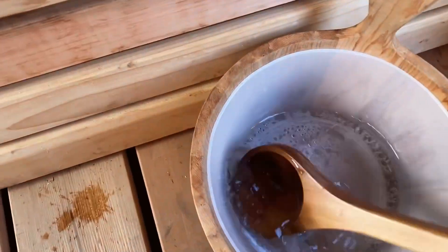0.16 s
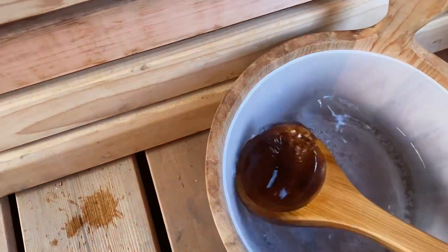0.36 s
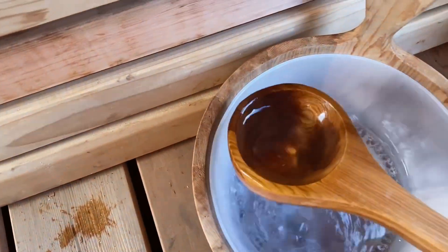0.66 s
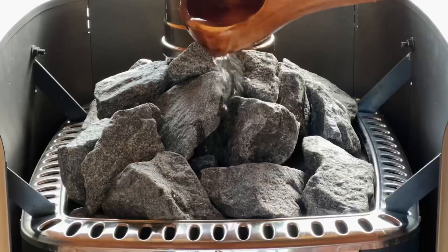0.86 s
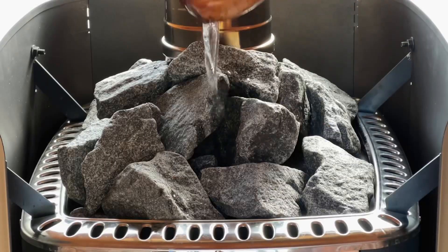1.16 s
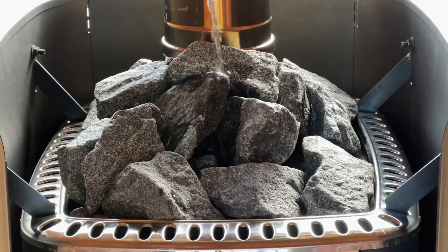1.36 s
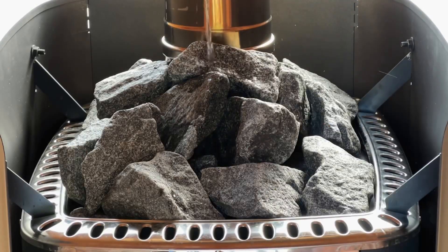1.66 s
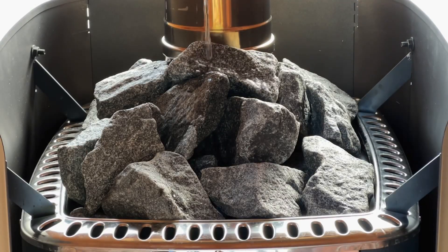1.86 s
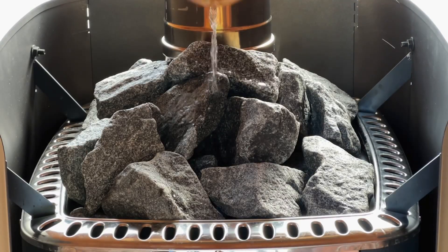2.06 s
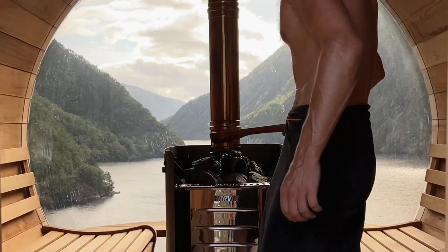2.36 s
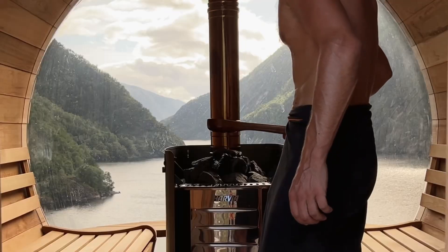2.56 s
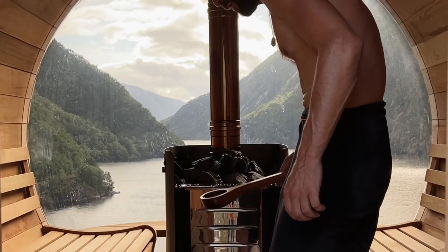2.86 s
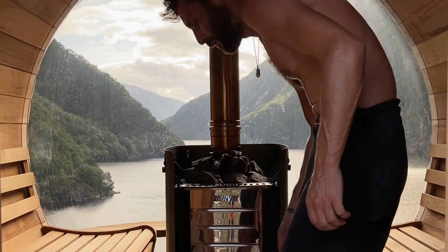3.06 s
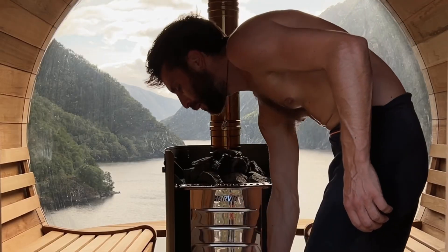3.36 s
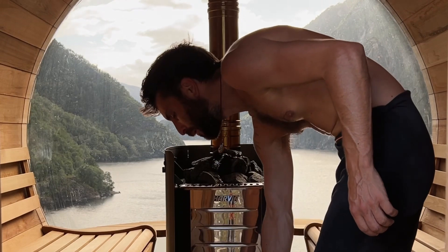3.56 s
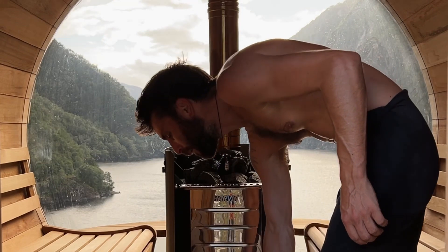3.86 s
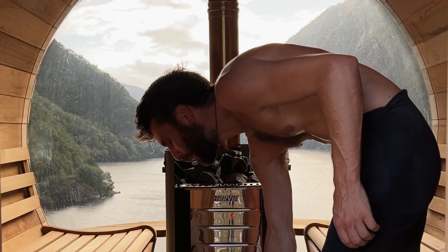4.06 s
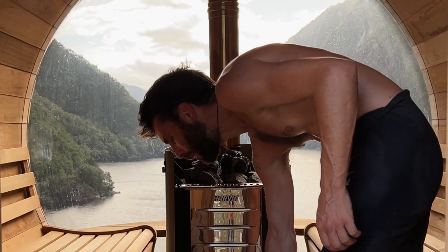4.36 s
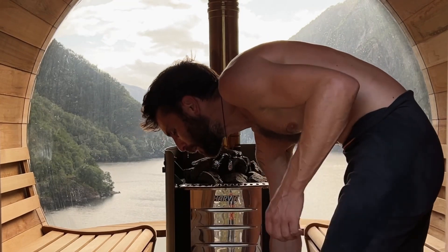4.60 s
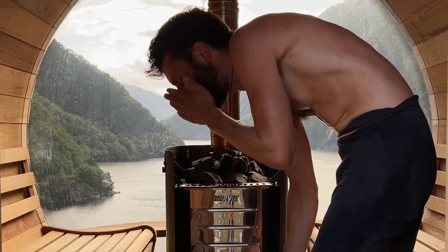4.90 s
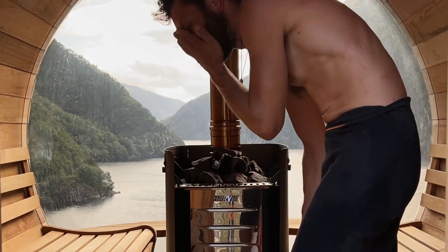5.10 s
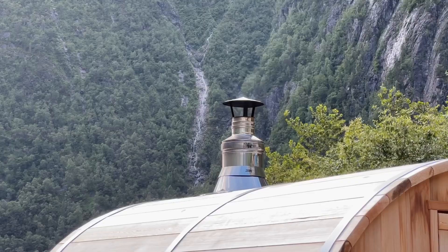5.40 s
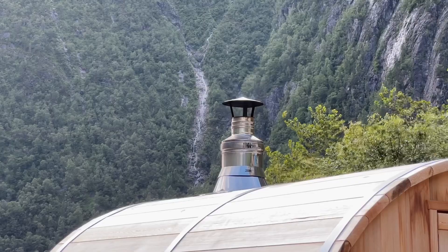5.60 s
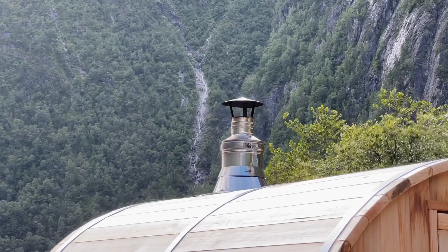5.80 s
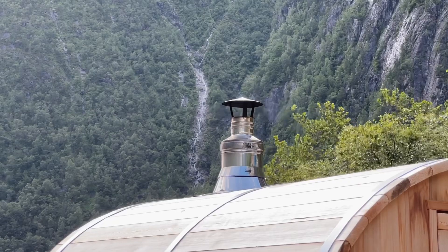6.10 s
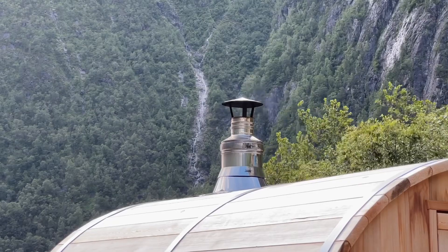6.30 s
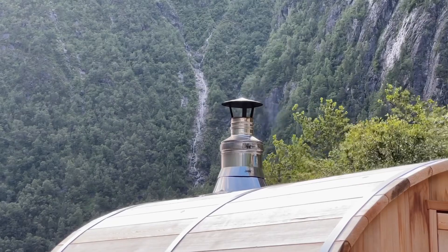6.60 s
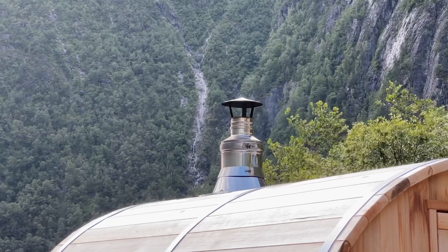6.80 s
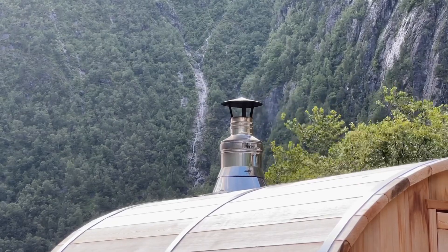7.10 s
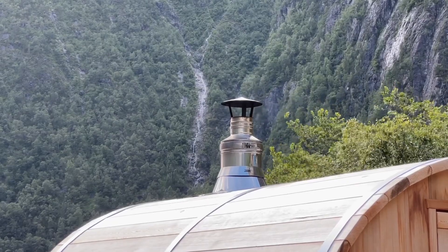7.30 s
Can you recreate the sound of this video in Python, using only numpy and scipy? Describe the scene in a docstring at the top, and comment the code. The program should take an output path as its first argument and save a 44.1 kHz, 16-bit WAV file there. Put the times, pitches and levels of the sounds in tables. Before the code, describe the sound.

A wooden ladle stirs and drips in a hollow bucket, water hisses on hot sauna stones, then the sizzle fades among floor thumps and a slap.

```python
"""Over a faint, deep draught, a wooden ladle stirs and fills in a bucket: the wall booms, air bubbles ring.
Then, right over hot sauna stones, poured water flashes to steam: random pops hiss, burst and simmer.
Then, from across the small wooden cabin, the sizzle dies down as the stones dry. Feet thump, knock and
scuff on the floorboards with sagging tones and shaped noise, and a wet hand slaps on skin."""
import sys
import numpy as np
from scipy import signal
from scipy.fft import rfft, irfft, next_fast_len
from scipy.io import wavfile

SR = 44100
rng = np.random.default_rng(int(sys.argv[2]) if len(sys.argv) > 2 else 0)


def int16_out(signal):
    """Quantize to a 16-bit WAV file."""
    q = np.round(np.clip(np.atleast_2d(signal).T, -1, 1) * 32767)
    wavfile.write(sys.argv[1], SR, q.astype(np.int16))


N = 328545
T = np.arange(N) / SR  # time in s
SIZE = next_fast_len(N + SR // 2, real=True)
HZ = np.arange(SIZE // 2 + 1) * SR / SIZE + 1e-3  # frequencies of the filters, just above 0 so logs work

AT_STONES_S, ACROSS_ROOM_S = 0.832, 2.233  # the listening place changes at once
BUBBLE_CYCLES = 36  # a small bubble takes this many cycles to fade by 60 dB

# deep and middle parts of a blow on wood: pitch_hz, level_db
WOOD_BOOM = [(25, -46), (50, -3.5), (75, -3.5), (120, -9.5), (170, -19), (400, -73)]
WOOD_BODY = [(90, -24), (190, 2.5), (290, -3), (420, -8), (650, -30), (1500, -69)]
# resonances of the floorboards: pitch_hz, width_hz, level_db
BOARD_RING = [(138, 13, 8.6), (160, 16, 0.76), (318, 80, 1.5), (490, 16, 5), (720, 28, 5), (844, 260, 4.9),
              (1274, 190, 7.1)]
# boards knock under shifting weight: start_s, boom_db, body_db, clack_db, ring_db, board_pitch_hz
KNOCKS = [(3.786, -65, -55, -51, -41, 275), (4.426, -38, -38, -36, -35, 258),
          (4.44, -35, -35, -39.5, -22.5, 264.7), (4.506, -44, -43, -51, -27.5, 262),
          (4.915, -68, -40.5, -52, -37, 308), (5.626, -48, -39, -37.5, -24, 270.4),
          (5.65, -54, -40.5, -50, -31, 285.3), (6.333, -47.5, -43, -51, -38, 293.4),
          (6.622, -61, -42, -48, -33.5, 334.5), (7.385, -72, -44, -70, -38.5, 263)]


def undb(db):
    """Decibels to gain."""
    return 10 ** (np.asarray(db) / 20)


def together(gains):
    """Level in dB of unrelated sounds that overlap: their powers add."""
    return 10 * np.log10(sum(g ** 2 for g in gains) + 1e-18)


def filtered(x, gain):
    """Apply a gain per frequency."""
    return irfft(rfft(x, SIZE) * gain, SIZE)[..., :N]


def colour(points):
    """Gain per frequency from (Hz, dB) points."""
    hz, db = np.transpose(points)
    return undb(np.interp(np.log(HZ), np.log(hz), db))


def resonances(table):
    """Gain per frequency of a few (Hz, width Hz, dB) peaks."""
    return undb(sum(db / (1 + (2 * (HZ - hz) / width) ** 2) for hz, width, db in table))


def below(hz, order=8):
    """Gain that keeps what lies below a frequency and fades what lies above."""
    return 1 / np.sqrt(1 + (HZ / hz) ** order)


def unit(x, band):
    """Scale a stereo sound so that its middle has rms 1 inside a band."""
    power = np.abs(rfft(x.mean(0), SIZE)[(HZ > band[0]) & (HZ < band[1])]) ** 2
    return x / np.sqrt(2 * power.sum() / SIZE / N)


def walk(rate):
    """Slow random wandering around 0 with a spread near 1."""
    knots = rng.standard_normal(2048)
    return 1.15 * np.interp(T * rate, np.arange(len(knots)), knots)


def between(start, end):
    """1 between two times, with very short fades."""
    fade_s = 0.004
    return np.clip((T - start) / fade_s, 0, 1) * np.clip((end - T) / fade_s, 0, 1)


def swell(s, rise, t60, hold=0):
    """Envelope that rises from time s, holds, then fades by 60 dB in t60 seconds."""
    fading = np.maximum(T - s - rise - hold, 0)
    return np.clip((T - s) / rise, 0, 1) * undb(-60 * fading / t60)


def add(out, s, x):
    """Mix a short sound in at time s."""
    i = max(int(s * SR), 0)
    out[..., i:i + x.shape[-1]] += x[..., :N - i]


def pops(rate, spread_db):
    """Single-sample clicks at random moments, of random size and sign."""
    out = np.zeros(N)
    at = np.flatnonzero(rng.random(N) < rate / SR)
    size = np.clip(rng.standard_normal(N)[at], -3, 2.5)
    sign = 2 * rng.integers(0, 2, N)[at] - 1
    out[at] = sign * undb(spread_db * size)
    return out


def room(x, wet_db, t60, width):
    """Direct sound plus the short, dense echo of wooden walls, partly different at each ear."""
    t = T[:SR // 4]
    mid, side = rng.standard_normal((2, len(t))) * undb(-60 * t / t60) * (t > .002)
    echo = (mid + width * np.array([side, -side])) * undb(wet_db) / np.linalg.norm(mid)
    echo[:, 0] += 1  # the direct sound
    return signal.oaconvolve(x[None], echo, axes=1)[:, :N] / np.sqrt(1 + undb(2 * wet_db))


def blows(rows, tone, width):
    """Blows (s, dB over the first 45 ms, rise s, t60 s) that wake many close modes: fading, coloured noise."""
    out, t, first = np.zeros((2, N)), T[:SR // 2], slice(0, 2000)
    gain = np.interp(np.fft.rfftfreq(len(t), 1 / SR), HZ, tone)
    for s, db, rise, t60 in rows:
        shape = np.minimum(t / rise, 1) * undb(-60 * np.maximum(t - rise, 0) / t60)
        mid, side = irfft(rfft(rng.standard_normal((2, len(t)))) * gain) * shape
        mid, side = mid / mid[first].std(), side / side[first].std()
        add(out, s, undb(db) * (mid + width * np.array([side, -side])))
    return out


def wood(table, ring):
    """Each blow booms in the whole structure, rings the struck board and clacks at the contact."""
    # the contact itself: pitch_hz, level_db
    wood_clack = [(250, -3.5), (550, 8.5), (850, -1), (1300, -6), (2200, -6.5), (4000, -16.5),
                  (9000, -29.5), (15000, -47)]
    s, boom_db, body_db, clack_db, rise, t60 = np.transpose(table)
    boom_part = blows(zip(s, boom_db, rise, t60 * 2.0), colour(WOOD_BOOM) * ring, width=0.21)
    body = blows(zip(s, body_db, rise * 1.08, t60 * 1.43), colour(WOOD_BODY) * ring, width=0.15)
    clack = blows(zip(s, clack_db, rise * .5, t60 * 1.09), colour(wood_clack) * ring, width=0.54)
    return boom_part + body + clack


def draught():
    """The stove draws air with a faint, deep rumble of filtered noise."""
    # pitch_hz, level_db
    draught_colour = [(25, -13), (65, 4.5), (110, -2.5), (180, -16), (500, -45), (2000, -80)]
    level_db, width = -55, 0.18
    mid, side = filtered(rng.standard_normal((2, N)), colour(draught_colour))
    return undb(level_db) * (mid + width * np.array([side, -side])) / mid.std()


def boom():
    """Each push swells the bucket's low modes; the lowest rings on once the ladle no longer damps it."""
    # low modes: pitch_hz, t60_s with the ladle in the water, t60_s once it is lifted out
    boom_modes = [(69, 0.33, 2), (108.1, 1, 0.6), (136.6, 1, 0.34)]
    # the ladle pushes the wall: start_s, lowest_mode_db, second_mode_db, third_mode_db
    pushes = [(-.02, -21, -28.5, -29.5), (.145, -32, -29.5, -38), (.255, -40, -22, -26.5),
              (.335, -22, -47, -30), (.45, -23.5, -29.5, -55)]
    ladle_out_s, rise_s = 0.356, 0.02
    out, stirred = 0, T < ladle_out_s
    starts, *levels = np.transpose(pushes)
    for (hz, damped_t60, free_t60), push_db in zip(boom_modes, levels):
        lost_db = np.cumsum(60 / np.where(stirred, damped_t60, free_t60)) / SR
        swells = []
        for s, db in zip(starts, push_db):
            lost_since_push = np.maximum(lost_db - np.interp(s + rise_s, T, lost_db), 0)
            swells.append(np.clip((T - s) / rise_s, 0, 1) * undb(db - lost_since_push))
        detune = np.where(stirred, .03, .008) * walk(25.0)  # the moving water detunes the wall
        tone = np.sin(2 * np.pi * np.cumsum(hz * (1 + detune)) / SR)
        out = out + undb(together(swells)) * tone
    return np.sqrt(2) * out


def bubble(hz, t60, glide):
    """A ringing air bubble whose pitch climbs as it nears the surface, by its glide every half t60."""
    rise_cycles = 1.7
    t = T[:SR // 6]
    pitch = hz * (1 + glide * np.minimum(2 * t / t60, 2))
    envelope = (1 - np.exp(-t * hz / rise_cycles)) * undb(-60 * t / t60)
    return np.sin(2 * np.pi * np.cumsum(pitch) / SR) * envelope


def trickle(count=16):
    """Water runs off the lifted ladle: a quick, broken run of small bubbles, growing weaker."""
    start_s, length_s, level_db = 0.6, .14, -39.5
    out = np.zeros(N)
    for when, pitch, size in rng.random((count, 3)):
        hz = 1200 * 2.4 ** (pitch ** 2)
        gain = undb(level_db + 6.4 * size - 5.6 * when)
        add(out, start_s + length_s * when, gain * bubble(hz, BUBBLE_CYCLES / hz, 0.05))
    return out


def drips(count=60):
    """Plops, gulps, small bubbles and ticks of drops; the hollow of the bucket rings after them."""
    # air bubbles, large and small: start_s, level_db, pitch_hz, pitch rise per half t60 (share), t60_s
    bubbles = [(0.18, -20, 1237, 0.057, 0.064), (0.207, -25.5, 1634, .03, 0.035),
               (.208, -21, 820, .03, 0.039), (.209, -18, 1150, .03, 0.022),
               (0.3075, -16, 1335, 0.23, 0.022), (.341, -14.5, 824, 0.2, 0.02),
               (.349, -25, 990, .06, 0.034), (.374, -34.5, 1960, 0.13, 0.05), (.395, -37, 1340, .04, 0.065),
               (.424, -31, 4400, 0.09, 0.014), (.458, -34, 4700, .04, 0.024),
               (0.466, -25.5, 3900, 0.05, 0.015), (.471, -34, 3100, .05, .016),
               (.498, -34, 5240, .02, 0.012), (0.509, -40, 1270, .01, 0.05),
               (.53, -36, 1256, 0.0091, 0.063), (.551, -41, 1300, .02, 0.054), (.553, -37, 2000, .05, .02),
               (.577, -28, 2640, 0.036, 0.022), (.645, -29.5, 1640, 0.019, 0.04),
               (0.665, -26, 3100, .12, 0.016), (.666, -28.5, 1620, 0.093, 0.054),
               (0.708, -35, 1160, 0.042, 0.094), (.731, -38, 586, .03, 0.099), (.753, -38, 1240, .03, .05),
               (.765, -33, 3420, .08, 0.015), (.771, -35, 5100, .08, .014), (.777, -33, 2790, 0.06, 0.025),
               (.784, -34, 5400, .03, .014), (.789, -37, 654, .02, 0.082)]
    # low gulps of air around the moving ladle: same columns
    gulps = [(.107, -40, 612, .02, .15), (.207, -25, 485, .03, 0.065), (.211, -18, 180, 0.044, 0.14),
             (.217, -21.5, 370, .04, 0.13), (.236, -33, 790, .03, 0.046), (.256, -28, 490, .03, 0.05),
             (.274, -34, 580, .04, 0.067), (.356, -30, 367, .08, 0.098), (.41, -33, 426, 0.044, .08),
             (.432, -30, 345, .05, .07)]
    # drops off the ladle tick on the water: start_s, level_db before the filters
    drops = [(0.209, -46), (.308, -45), (.559, -33), (0.571, -26), (0.645, -30), (.665, -32), (0.696, -44)]
    # the hollow of the bucket: pitch_hz, level_db, t60_s
    bucket_echo = [(606, -1, .3), (1330, 4.5, 0.49), (1800, 0, .2), (2800, -7, .15)]
    splash_db, splash_s = -15, 0.0018  # a bubble pinches off with a tiny splash, relative to its ring
    plops, ticks, t = trickle(), np.zeros(N), T[:SR // 50]
    for s, db, hz, glide, t60 in bubbles:
        add(plops, s, undb(db) * bubble(hz, t60, glide))
        splash = rng.standard_normal(len(t)) * np.exp(-t / splash_s)
        add(ticks, s, undb(db + splash_db) * min(hz / 3500, 1) * splash)  # low bubbles splash less
    for s, db, hz, glide, t60 in gulps:
        add(plops, s, undb(db) * bubble(hz, t60, glide))
    for s, db in drops:
        add(ticks, s, undb(db) * rng.standard_normal(len(t)) * np.exp(-t / 0.0028))
    for when, pitch, size in rng.random((count, 3)):
        hz = 1800 * 3.7 ** pitch
        gain = undb(-53 + 11 * size ** 2)
        add(plops, when * AT_STONES_S, gain * bubble(hz, BUBBLE_CYCLES / hz, 0.055))
    hollow = 1
    for hz, db, t60 in bucket_echo:
        hollow = hollow + undb(db) / (1 + 2j * np.pi * (HZ - hz) * t60 / np.log(1000))
    wet = filtered(plops + filtered(ticks, below(7700, order=3)), hollow)
    return room(wet, wet_db=-7, t60=0.38, width=1.1)


def bucket():
    """The stirred bucket booms and is bumped while water swirls and drips off the ladle."""
    # colour of the sloshing: pitch_hz, level_db
    slosh_colour = [(200, 1), (350, 1.5), (700, -2.5), (1600, -5), (2500, -7), (4500, -8), (7000, -11),
                    (9000, -27.5), (12000, -22), (15000, -60)]
    # resonances of the bucket: pitch_hz, width_hz, level_db
    bucket_ring = [(205, 46, -1.5), (382, 17, 5), (621, 39, 10.5), (790, 49, 0), (1260, 64, 5),
                   (2040, 270, 4.5), (2640, 420, 4)]
    # the ladle bumps the bucket: start_s, boom_db, body_db, clack_db, then rise_s and t60_s, scaled per part
    bumps = [(0.0, -25, -29.5, -28.5, 0.00075, 0.33), (0.208, -37, -31.5, -46, 0.00045, 0.31),
             (0.265, -35, -34, -55, 0.017, 0.39), (0.342, -29.5, -38.5, -58, 0.0033, 0.48),
             (0.694, -63, -64, -44.5, 0.0011, 0.13)]
    # strokes of the ladle swirl the water: start_s, level_db, rise_s
    strokes = [(.16, -37, 0.069), (.645, -45.5, 0.035)]
    stroke_t60_s, steady_swirl_db, spray_db = 0.97, -50.5, -49  # a stroke dies away into the steady swirl
    ring = resonances(bucket_ring)
    stroke_gains = [undb(db) * swell(s, rise, stroke_t60_s) for s, db, rise in strokes]
    swirl_db = together([undb(steady_swirl_db)] + stroke_gains)
    splashing = room(pops(2500, spread_db=2.5), wet_db=-3.5, t60=0.35, width=1.6)
    water = filtered(splashing, colour(slosh_colour) * ring ** 0.24)
    low = below(1260)
    swirl = unit(filtered(water, low), (250, 2000)) * undb(swirl_db)
    spray = unit(filtered(water, 1 - low), (3000, 8000)) * undb(spray_db)
    return boom() + swirl + spray + drips() + wood(bumps, ring)


def thuds():
    """A soft heel bends the floor for a few deep cycles and stirs the boards around it."""
    # start_s, level_db, pitch_hz at the start, rise_s, t60_s
    heel_thuds = [(2.473, -24.5, 87, 0.025, 0.13), (2.526, -35, 204, .005, 0.13),
                  (2.54, -28, 119, .007, .06), (2.672, -35, 132, .012, 0.072), (2.699, -38, 62, .015, .15),
                  (3.902, -31.5, 73, 0.032, .14), (4.003, -27.5, 100, .022, .22),
                  (4.052, -21, 113, 0.007, 0.058), (4.098, -29.5, 64, .016, .15),
                  (4.262, -37.5, 86.6, 0.017, .2), (4.313, -38, 96, .02, .15),
                  (4.429, -35, 72, 0.0092, .15), (4.575, -33, 112, .01, 0.11),
                  (4.612, -32.5, 85.5, .012, .2), (6.641, -28, 144, 0.013, 0.16),
                  (6.648, -30, 89, 0.0059, .15), (6.765, -31, 86, 0.015, 0.11),
                  (6.795, -27, 83, 0.015, 0.19), (7.198, -32, 108, 0.0087, 0.086)]
    body_db = -30  # relative to the thud
    sag, sag_s = 0.14, 0.034  # the pitch sags by a share, with this time constant, as the weight settles
    out, t = np.zeros(N), T[:SR // 2]
    for s, db, hz, rise, t60 in heel_thuds:
        pitch = hz * (1 - sag * (1 - np.exp(-t / sag_s)))
        add(out, s, undb(db) * np.sin(2 * np.pi * np.cumsum(pitch) / SR) * swell(0, rise, t60)[:len(t)])
    body_rows = [(s, db + body_db, rise, t60) for s, db, _, rise, t60 in heel_thuds]
    body = blows(body_rows, colour(WOOD_BODY), width=0.43)
    return room(out, wet_db=-21, t60=0.54, width=1.0) + body


def boards():
    """A knocked board bends and rings on in its own modes; the high ones speak first."""
    # modes of a floorboard: multiple of its pitch, level_db relative to the ring, t60_s
    board_modes = [(1, 1.5, 0.23), (1.19, -6, 0.22), (1.85, -14.5, .25), (2.55, -18, .3), (3.2, -18, 0.2),
                   (4.5, -21, 0.44), (4.85, -9, .07)]
    delay_s, rise_cycles = 0.0035, 2.1  # each mode builds up over a few of its own cycles
    out, t = np.zeros(N), T[:SR // 2]
    for s, *_, db, hz in KNOCKS:
        detune = 1 + .01 * rng.standard_normal(len(board_modes))
        for (ratio, mode_db, t60), d in zip(board_modes, detune):
            cycles = hz * ratio * d * t
            envelope = undb(db + mode_db - 60 * t / t60) * np.minimum(cycles / rise_cycles, 1)
            add(out, s + delay_s, envelope * np.sin(2 * np.pi * cycles))
    return room(out, wet_db=-11, t60=0.37, width=0.52)


def scuffs():
    """A sliding sole scrapes the board, shakes the floor and hisses over grit."""
    # start_s, scrape_db, body_db, grit_db, rise_s
    sole_scuffs = [(4.69, -50, -43.5, -62, 0.011), (5.43, -44, -50.5, -60, 0.011),
                   (6.62, -49, -42, -47.5, 0.0068), (6.735, -46, -46, -51.5, .018),
                   (6.82, -37.5, -40.5, -50, 0.013), (6.85, -40, -43.5, -57, 0.01),
                   (7.112, -41.5, -39.5, -48, 0.014), (7.145, -50, -48, -62, 0.012)]
    # colours of the scrape and of the grit: pitch_hz, level_db
    scrape_colour = [(250, 0.5), (550, 7), (850, -2), (1300, -7), (2200, -7.5), (4000, -30), (9000, -38)]
    grit_colour = [(600, -18), (1500, 5), (2600, 0), (4500, -7), (7000, -9), (14000, -26)]
    boom_over_body_db = -4.5
    s, scrape_db, body_db, grit_db, rise = np.transpose(sole_scuffs)
    ring = resonances(BOARD_RING)
    t60, grit_t60 = np.full(len(s), 0.38), np.full(len(s), 0.23)
    boom_rows = zip(s, body_db + boom_over_body_db, rise, t60 * 2.7)
    boom_part = blows(boom_rows, colour(WOOD_BOOM) * ring, width=0.13)
    body = blows(zip(s, body_db, rise, t60 * 0.94), colour(WOOD_BODY) * ring, width=0.11)
    scrape = blows(zip(s, scrape_db, rise, t60), colour(scrape_colour) * ring, width=0.42)
    grit = blows(zip(s, grit_db, rise, grit_t60), colour(grit_colour), width=0.6)
    return boom_part + body + scrape + grit


def drags():
    """A sole sticks and slips in rapid random jolts, and the floor rumbles under it."""
    # start_s, level_db, hold_s
    sole_drags = [(6.636, -38, 0.12), (6.836, -35.5, 0.018)]
    # pitch_hz, level_db
    drag_colour = [(60, -28), (105, -10), (145, -4), (190, -10), (260, -24), (600, -49)]
    rise_s, t60_s = 0.0089, 0.28
    jolts = room(pops(600, spread_db=-2.5), wet_db=-9, t60=0.23, width=0.27)
    judder = unit(filtered(jolts, colour(drag_colour)), (60, 300))
    return judder * sum(undb(db) * swell(s, rise_s, t60_s, hold) for s, db, hold in sole_drags)


def feet():
    """Heels thud, boards knock and soles scuff, all on the same wooden floor."""
    rise_s, t60_s = 0.0051, 0.4  # of a knock, before wood() scales them for each part
    knocks = [(*row[:4], rise_s, t60_s) for row in KNOCKS]
    return thuds() + wood(knocks, resonances(BOARD_RING)) + boards() + scuffs() + drags()


def slap(ring):
    """A wet hand slaps on skin: a noise burst with the ring of the cupped hand, then the far wall's answer."""
    # pitch_hz, level_db
    slap_colour = [(100, -26), (200, -15), (400, -1), (700, 2), (1200, -2), (2100, -1.5), (3200, -9),
                   (5000, -16.5), (8000, -14.5), (11000, -20.5), (15000, -26)]
    # resonances of the cupped hand: pitch_hz, width_hz, level_db
    slap_ring = [(373, 49, 7), (1170, 98, 4.5), (2080, 180, 5), (2500, 250, -5)]
    hand, far_wall = (5.005, -29, 0.0019, 0.28), (5.021, -34, 0.0028, 0.56)  # start_s, level_db, rise_s, t60_s
    return blows([hand, far_wall], colour(slap_colour) * ring * resonances(slap_ring), width=0.41)


def surges():
    """Brief rises and dips in dB of the simmering and of the boiling."""
    # start_s is the middle of the change: start_s, length_s, simmer_change_db, boil_change_db
    stone_surges = [(1.145, 0.03, -2, 3), (1.2, 0.055, -1, 1.5), (1.395, 0.054, 3, -1),
                    (1.71, 0.056, 4, 1.5), (1.76, 0.027, 0, 2), (1.885, .04, 2, 2.5), (1.908, 0.11, 1, -5),
                    (2.06, 0.035, 1, 1), (2.184, 0.11, 0.5, -0.5), (2.59, 0.086, 1.5, 0),
                    (2.676, 0.032, 0, 1.5), (2.844, 0.096, 5.5, 3), (3.04, 0.092, 1.5, 2),
                    (3.23, 0.066, 1.5, 0.5), (3.32, 0.22, 2, 2.5), (3.747, 0.029, 7.5, 0.5),
                    (3.803, 0.042, 5, 0.5), (3.956, 0.038, 5, -0.5), (4.095, 0.049, 1, -1.5),
                    (4.294, 0.34, -1.5, -0.5)]
    change_db = 0
    for s, length, *changes in stone_surges:
        bump = np.exp(-np.minimum((2 * (T - s) / length) ** 2, 20))
        change_db = change_db + np.outer(changes, bump)
    return change_db


def sizzle(steam_db, boil_db, simmer_db, tilt_db, tone, width, rate, wet_db, flutter_db, count=3):
    """Water on hot stone: fine droplets hiss, larger bubbles burst, pockets deep in the pile simmer."""
    low, high, top = below(512), below(3570), below(5400, order=4)
    mid, side = (pops(rate * 9, spread_db=3.0) for _ in range(2))
    steam = mid + np.array([side, -side])
    # bubbles burst at several spots of the pile, each with its own path to the walls
    boil = sum(room(pops(rate / count, spread_db=3.0), wet_db, t60=0.27, width=0.63) for _ in range(count))
    simmer = room(pops(rate / 5, spread_db=2.5), wet_db - 3.5, t60=0.21, width=0.73)
    steam = unit(filtered(steam, tone * np.sqrt(1 - high ** 2)), (4000, 8500))
    boil = unit(filtered(boil, tone * high * np.sqrt(1 - low ** 2)), (700, 2600))
    simmer = unit(filtered(simmer, tone * low), (170, 480))
    dull, tilt = filtered(steam, top), undb(tilt_db)
    steam = dull / tilt + (steam - dull) * tilt  # a positive tilt brightens the hiss, a negative one dulls it
    sputter_db = flutter_db * walk(60)  # the water film touches and leaves the stone
    simmer_change, boil_change = surges()
    steam = steam * undb(steam_db + sputter_db)
    boil = boil * undb(boil_db + boil_change + sputter_db + 0.55 * walk(13))
    simmer = simmer * undb(simmer_db + simmer_change + 1.4 * walk(14))
    out = steam + boil + simmer
    side = filtered((out[0] - out[1]) / 2, colour(width))
    return out.mean(0) + np.array([side, -side])


def cabin():
    """From across the cabin the drying stones sizzle in its resonances; someone moves about and slaps skin."""
    # resonances of the cabin and stove: pitch_hz, width_hz, level_db
    cabin_ring = [(214, 34, 4), (285, 45, 2.5), (368, 35, 3), (625, 70, 4), (935, 67, 4), (1120, 61, 4),
                  (1295, 90, 5.5), (1600, 100, 2.5), (1810, 100, 3.5), (2060, 90, 3), (2230, 140, 2.5),
                  (2750, 150, 2), (3310, 180, 3.5), (4640, 170, 4), (4950, 220, 3.5), (7500, 360, 1.5)]
    # colour of the sizzle: pitch_hz, level_db
    far_colour = [(30, -7), (70, 3), (150, -6), (220, 4.5), (360, 4.5), (550, -9), (1300, -7.5),
                  (2100, -10.5), (4000, -18.5), (6000, -19), (7800, -13.5), (11000, -13.5), (15000, -16.5)]
    # width of the sizzle: pitch_hz, side_db
    far_width = [(80, 3), (250, -17.5), (700, 0.5), (1300, -6), (2400, -4), (4400, 2), (7500, -14.5),
                 (15000, -50)]
    # boiling grows while water seeps into the pile; then the stones dry with a time constant
    drying_s, drying_tau_s, seep_db_per_s = 3.89, 1.68, 0.6
    # levels ahead of the gain below
    steam_wet_db, steam_dry_db, boil_wet_db, boil_dry_db, simmer_db = -49.5, -58.5, -44.5, -49, -45.5
    tilt_db, pan_db, gain_db = -2, 1.2, -0.59  # pan: left over right
    ring = resonances(cabin_ring)
    wetness = np.exp(-np.maximum(T - drying_s, 0) / drying_tau_s)
    steam_db = steam_dry_db + (steam_wet_db - steam_dry_db) * wetness
    boil_db = boil_dry_db + (boil_wet_db - boil_dry_db) * wetness
    boil_db = boil_db - seep_db_per_s * np.maximum(drying_s - T, 0)
    stones = sizzle(steam_db, boil_db, simmer_db, tilt_db, colour(far_colour) * ring,
                    far_width, rate=2200, wet_db=5.0, flutter_db=0.88)
    panned = undb(gain_db) * stones * undb([[pan_db / 2], [-pan_db / 2]])
    return panned + feet() + slap(ring)


def pour():
    """Close over the stones the first water flashes to bright steam, gushes feed the boiling, gouts spit."""
    # gushes from the ladle: start_s, level_db ahead of the gain below, rise_s, t60_s
    gushes = [(.881, -58.5, 0.009, 1.1), (1.025, -47, 0.074, 4.9), (1.31, -47, 0.064, 7.7),
              (1.7, -45.5, 0.082, 19), (2.06, -41.5, 0.13, 9.1)]
    # gouts of water burst on the stones: start_s, level_db, rise_s, t60_s
    gouts = [(0.963, -49.5, 0.021, 0.13), (1.166, -32, 0.0018, 0.23)]
    # colour of the sizzle: pitch_hz, level_db
    near_colour = [(30, -15), (80, -3), (150, -9), (220, 0.5), (330, -4), (480, -9), (900, -4),
                   (1400, -5.5), (2500, -6.5), (3500, -10.5), (5000, -9.5), (7500, -7.5), (11000, -7.5),
                   (15000, -11)]
    # width of the sizzle: pitch_hz, side_db
    near_width = [(200, -16), (400, -5), (700, 3), (1300, -2), (2400, -55), (5800, -50), (7800, -35),
                  (15000, -29)]
    damp_stone_db, damp_simmer_db = -65, -62  # floors of boiling and simmering on barely damp stone
    steam_over_boil_db, simmer_over_boil_db = 1.5, -5
    damp_steam_db = -1.5  # less steam for the same boiling until the water has soaked in
    soak_s = 0.14  # time for the water to run down into the pile
    # the first water on dry stone flashes to a bright jet of steam
    flash_s, flash_db, flash_rise_s, flash_hold_s, flash_t60_s = 0.999, -39, 0.058, 0.086, 0.27
    wet_tilt_db, flash_tilt_db = -1.5, 3  # lean of the hiss to the top: on wet stone, and added by the flash
    gain_db = 1.64
    boil_db = together([undb(damp_stone_db)] + [undb(db) * swell(s, rise, t60) for s, db, rise, t60 in gushes])
    flash = swell(flash_s, flash_rise_s, flash_t60_s, flash_hold_s)
    flash = flash * np.clip((T - flash_s) / flash_rise_s, 0, 1)  # it gathers pace as the water spreads
    soaked = np.clip((T - flash_s) / soak_s, 0, 1) ** 2
    boil_steam_db = boil_db + steam_over_boil_db + damp_steam_db * (1 - soaked)
    steam_db = together([undb(boil_steam_db), undb(flash_db) * flash])
    simmer_db = together([undb(damp_simmer_db), undb(boil_db + simmer_over_boil_db) * soaked])
    stones = sizzle(steam_db, boil_db, simmer_db, wet_tilt_db + flash_tilt_db * flash ** 2, colour(near_colour),
                    near_width, rate=2600, wet_db=5, flutter_db=0.35)
    spit_colour = colour([(400, -18), (1500, 5.0), (4000, 5.0), (8000, 6.0), (15000, 0)])
    return undb(gain_db) * stones + blows(gouts, spit_colour, width=0.043)


def scene():
    """Bucket, stones and cabin, one after the other, over the draught."""
    lap = .003  # overlap in s
    at_bucket = bucket() * between(-1, AT_STONES_S + lap)
    at_stones = pour() * between(AT_STONES_S, ACROSS_ROOM_S + lap)
    across_room = cabin() * between(ACROSS_ROOM_S, 10)
    return at_bucket + at_stones + across_room + draught()


def record(dry):
    """Two channels, slightly unequal in level; left treble phase turns, thinning the middle near 10 kHz."""
    # turn of the left channel's phase: pitch_hz, turn_radians
    phase_turn = [(0, 0), (7200, 0.1), (8700, 1.57), (10200, 3.14), (11700, 4.7), (12700, 6.1),
                  (14300, 6.5), (15100, 7.85), (15800, 9.0)]
    top_hz = 15500  # the top is cut above this
    turn = np.interp(HZ, *np.transpose(phase_turn))
    left = filtered(dry[0], np.exp(-1j * turn)) * undb(-0.25)
    top_cut = signal.ellip(10, .2, 80, top_hz, fs=SR, output="sos")
    return signal.sosfilt(top_cut, np.array([left, dry[1]]))


dry = scene()
out = record(dry)
int16_out(out)
```